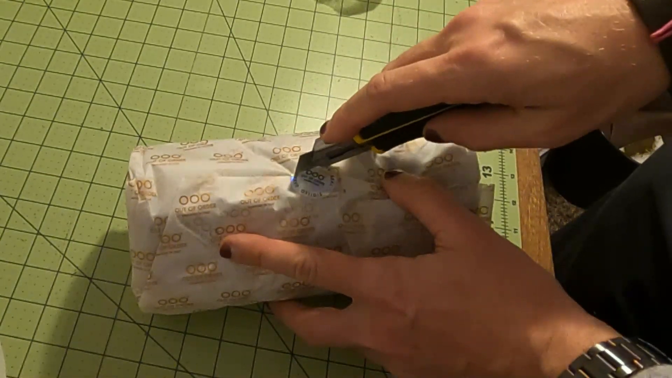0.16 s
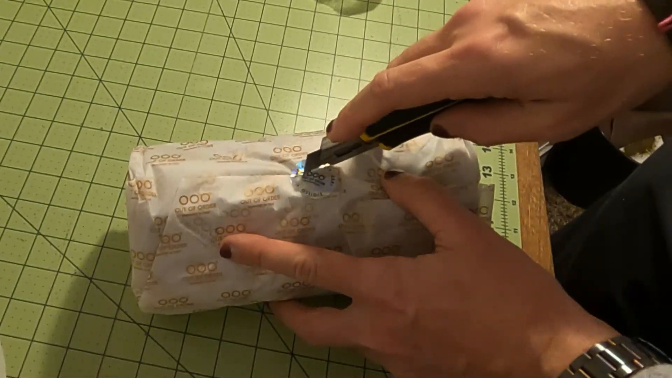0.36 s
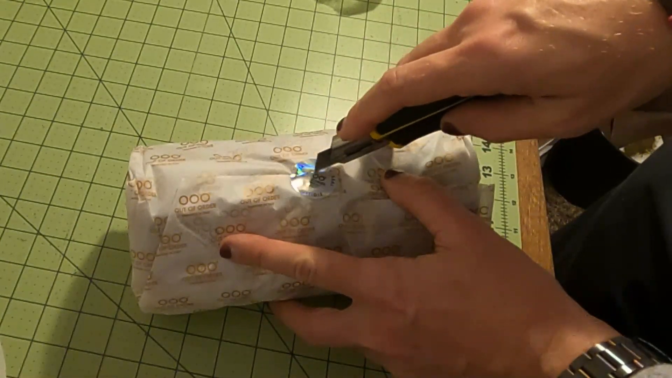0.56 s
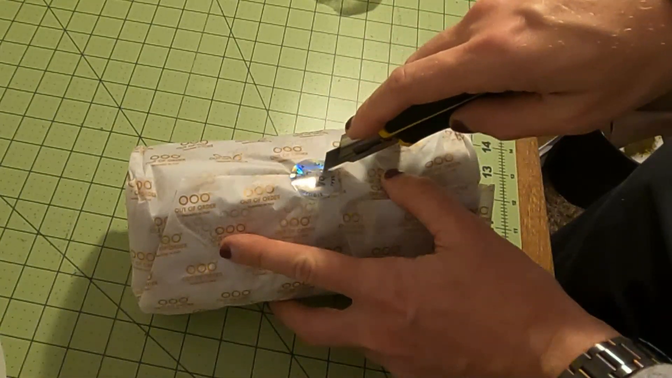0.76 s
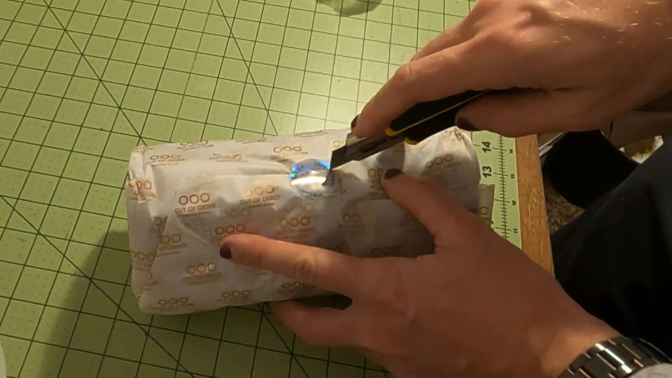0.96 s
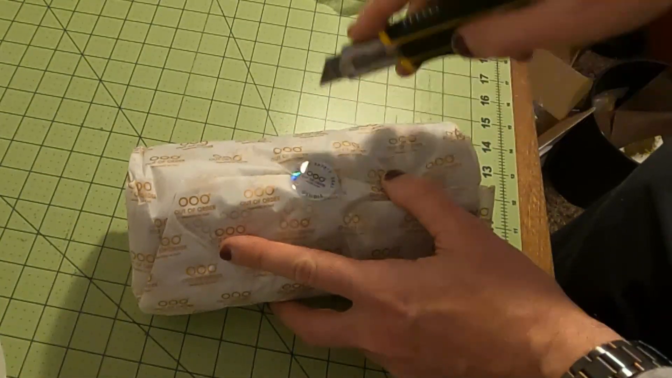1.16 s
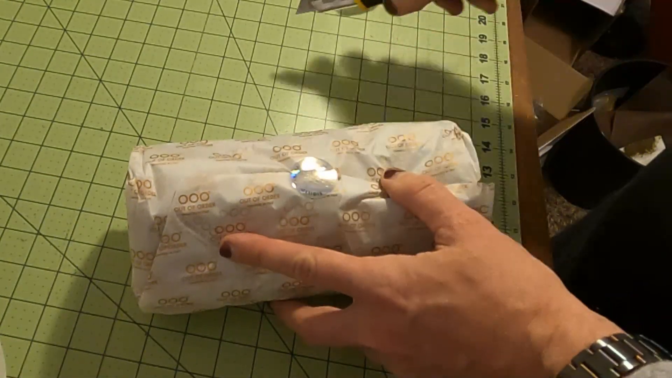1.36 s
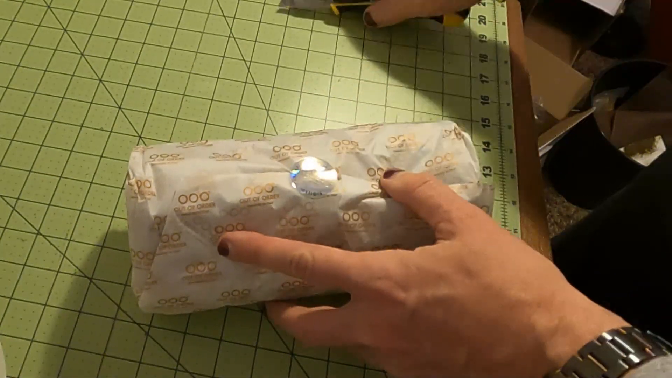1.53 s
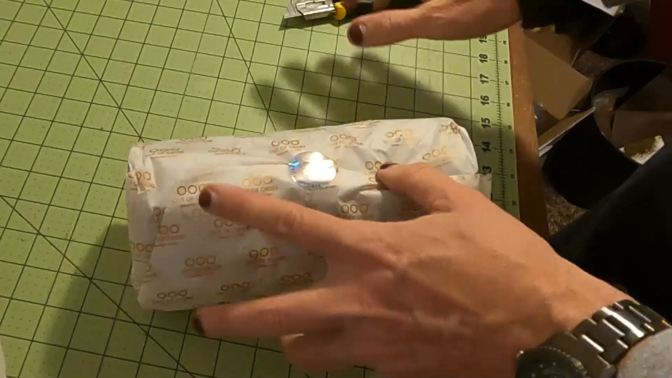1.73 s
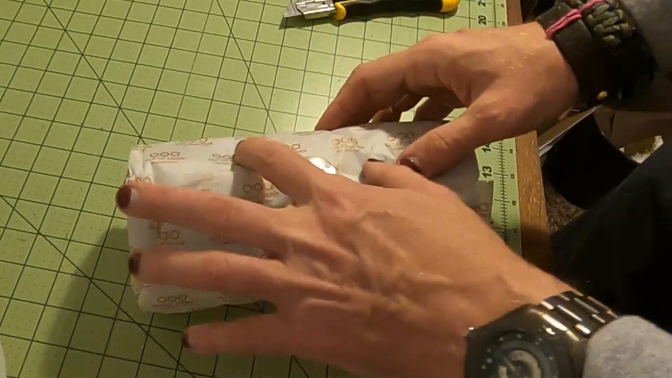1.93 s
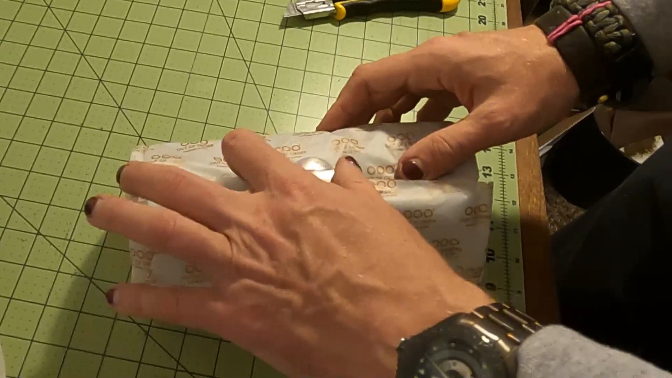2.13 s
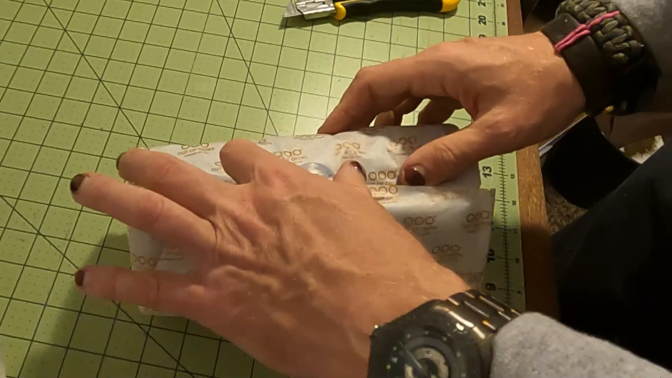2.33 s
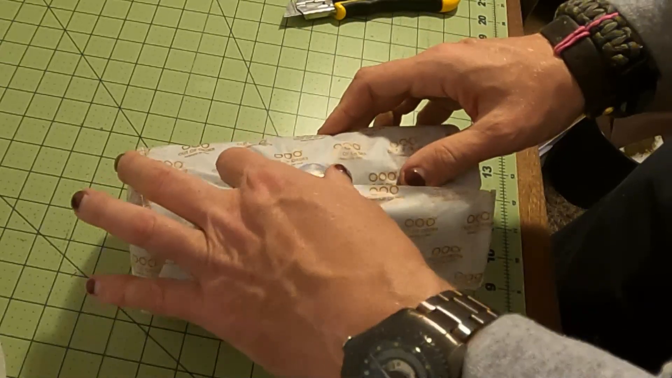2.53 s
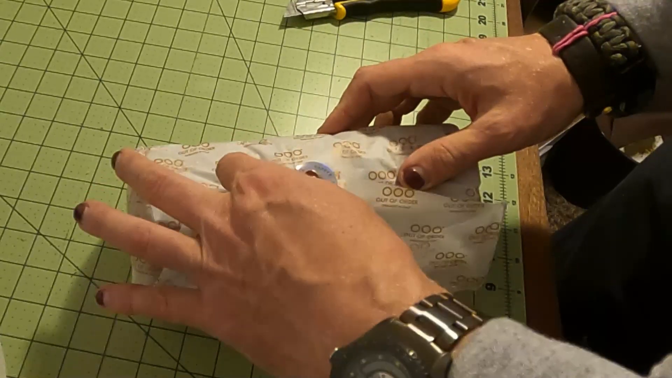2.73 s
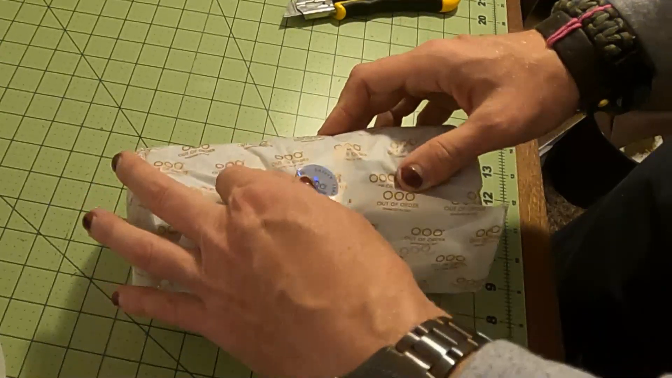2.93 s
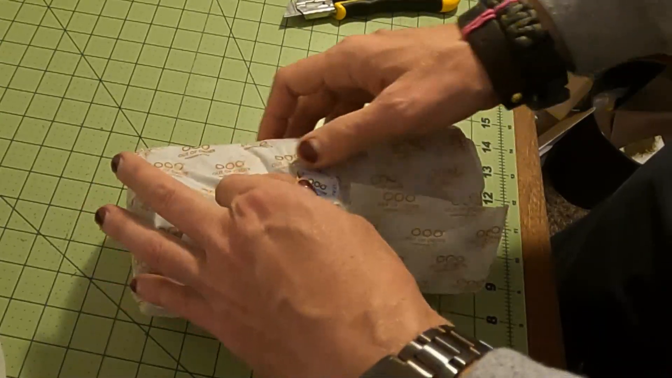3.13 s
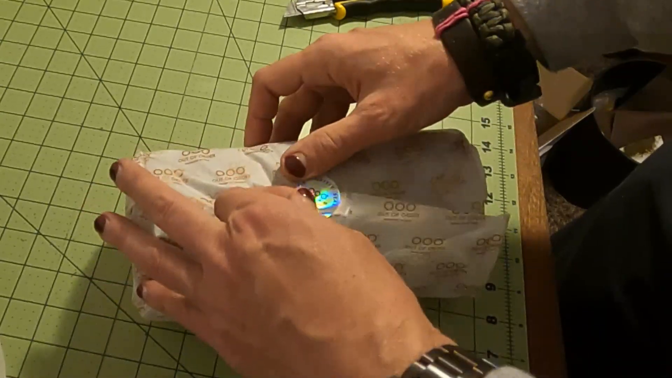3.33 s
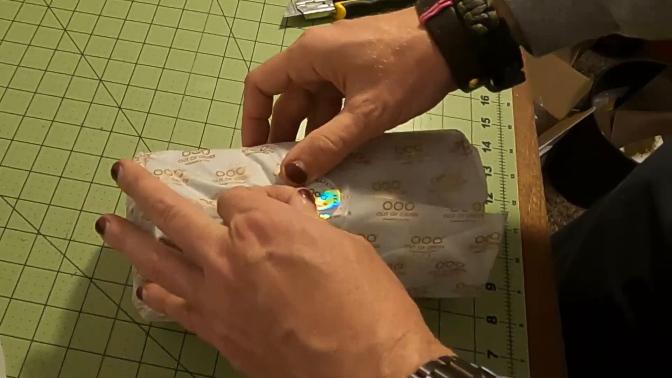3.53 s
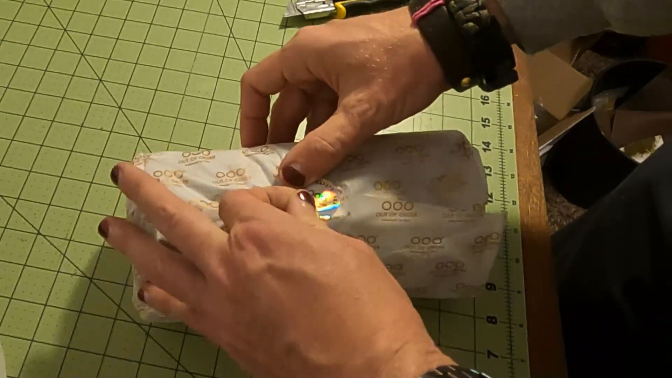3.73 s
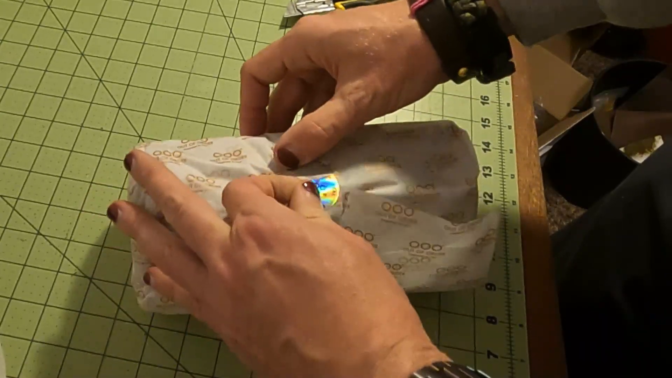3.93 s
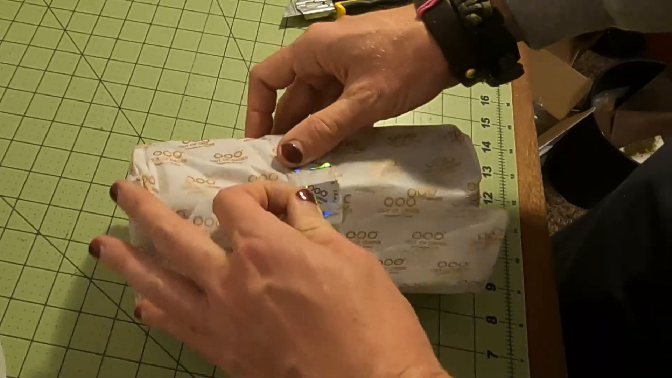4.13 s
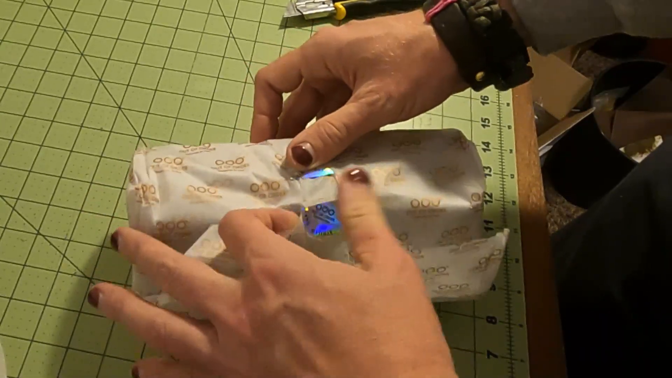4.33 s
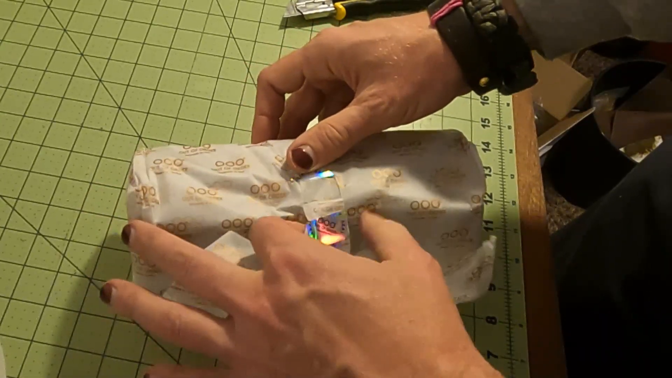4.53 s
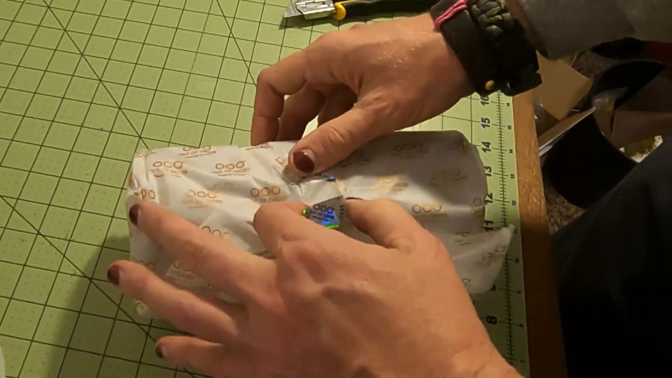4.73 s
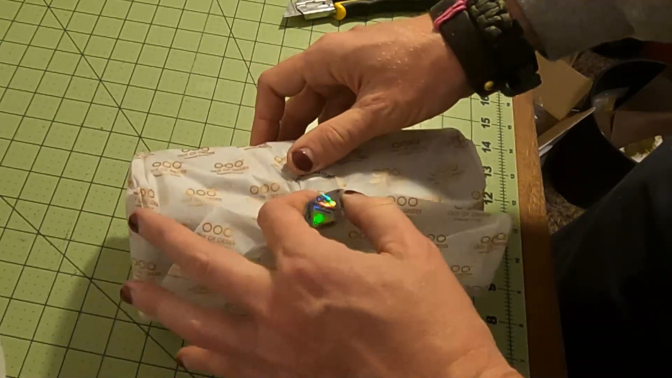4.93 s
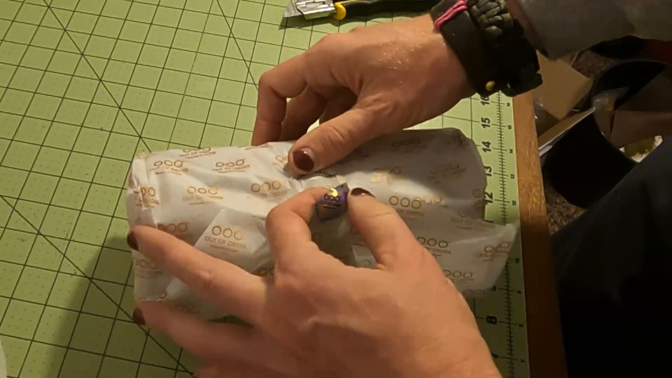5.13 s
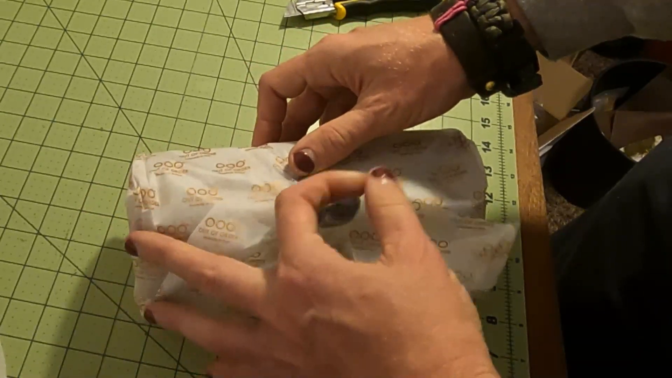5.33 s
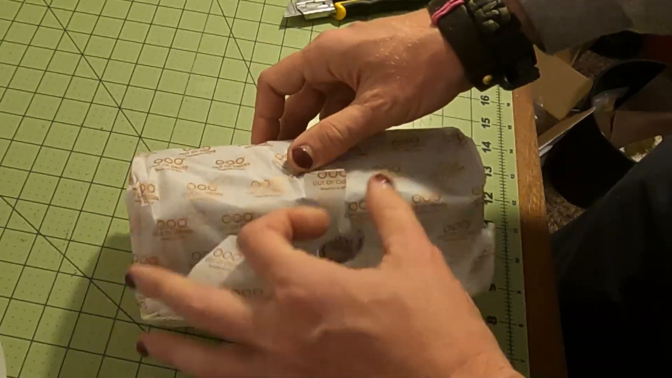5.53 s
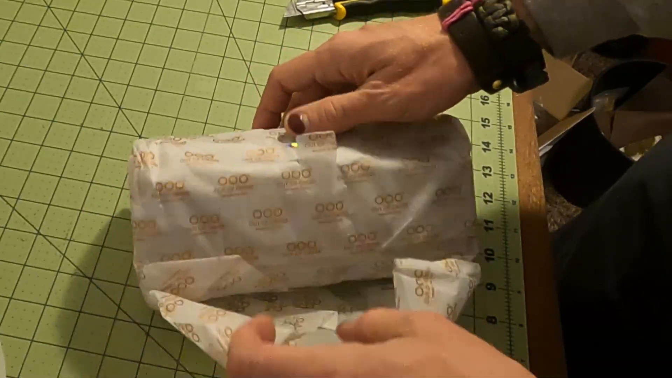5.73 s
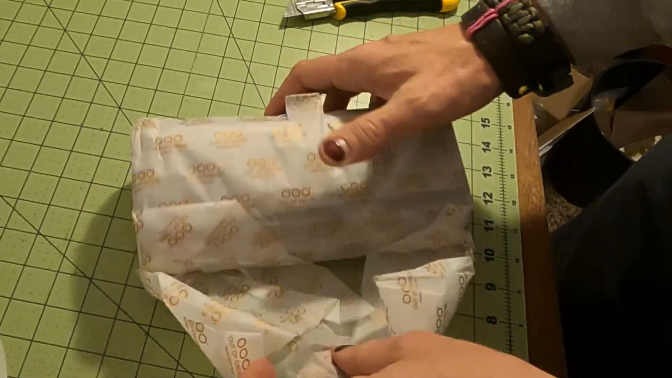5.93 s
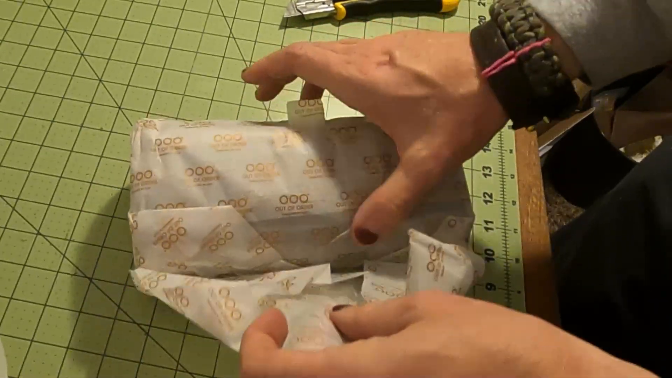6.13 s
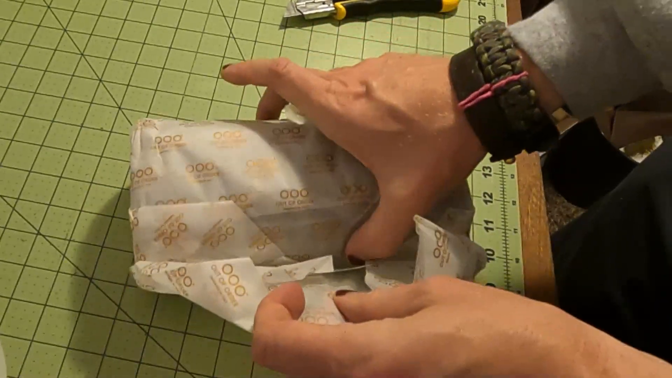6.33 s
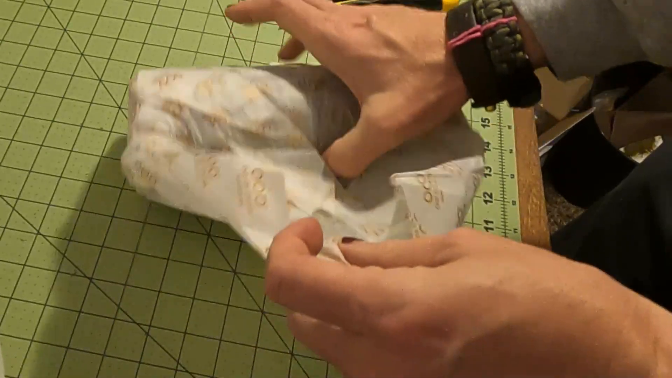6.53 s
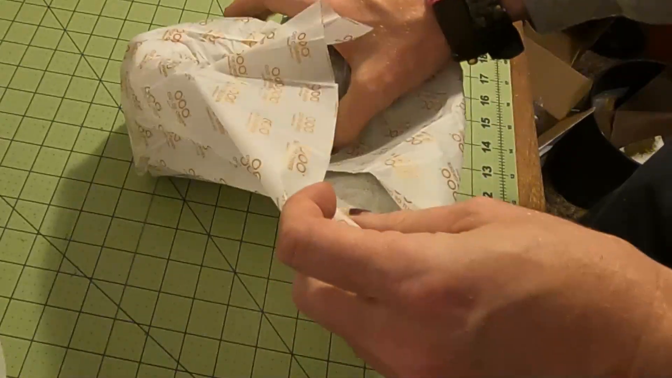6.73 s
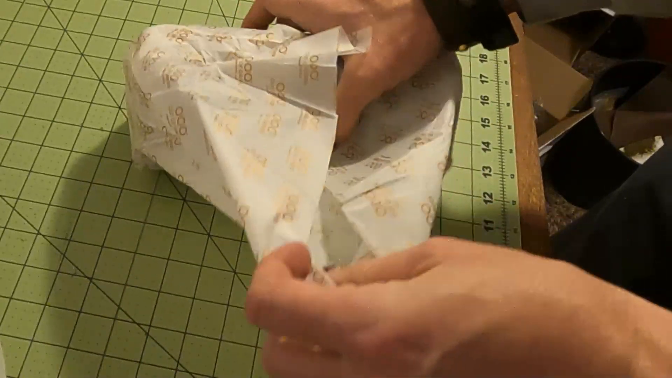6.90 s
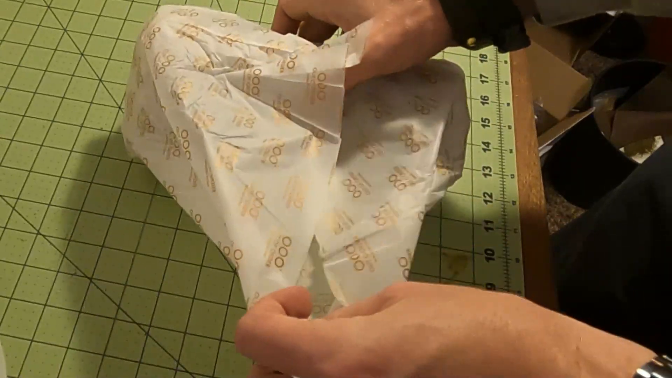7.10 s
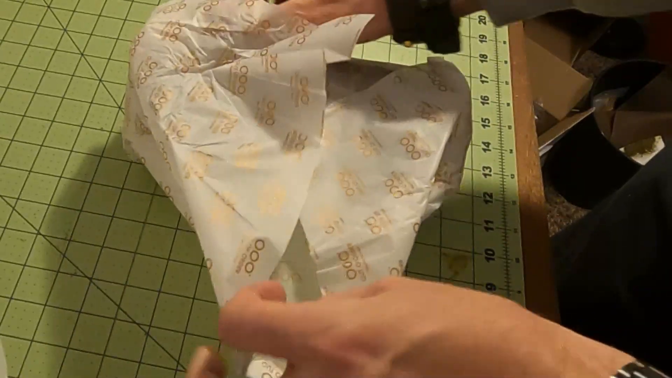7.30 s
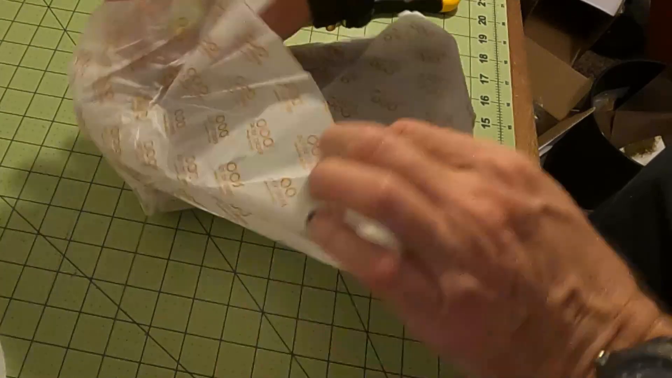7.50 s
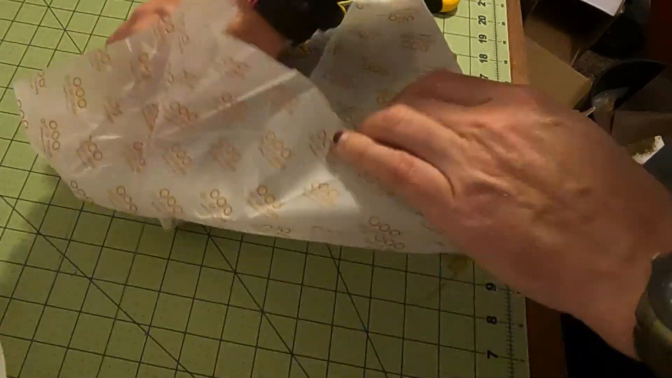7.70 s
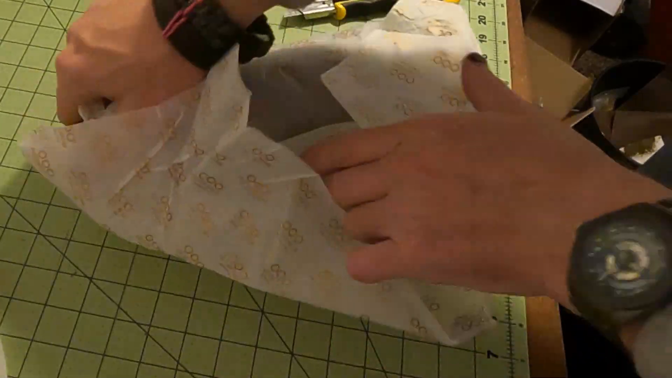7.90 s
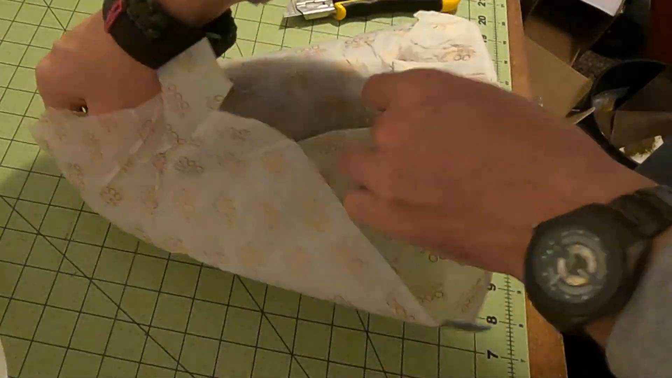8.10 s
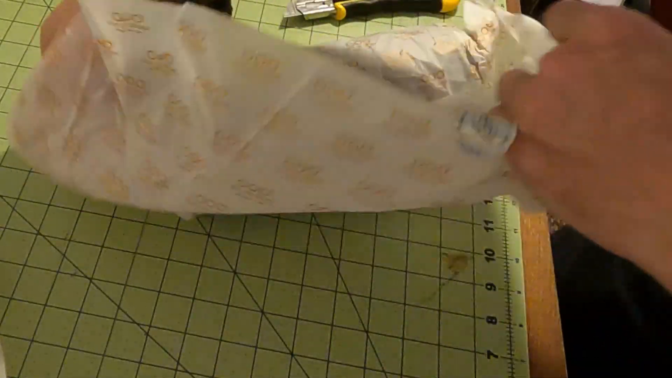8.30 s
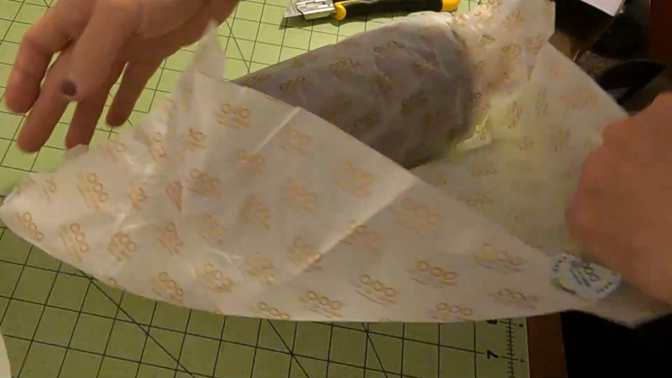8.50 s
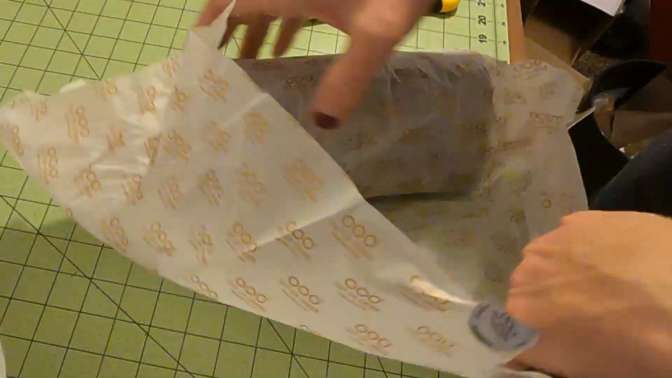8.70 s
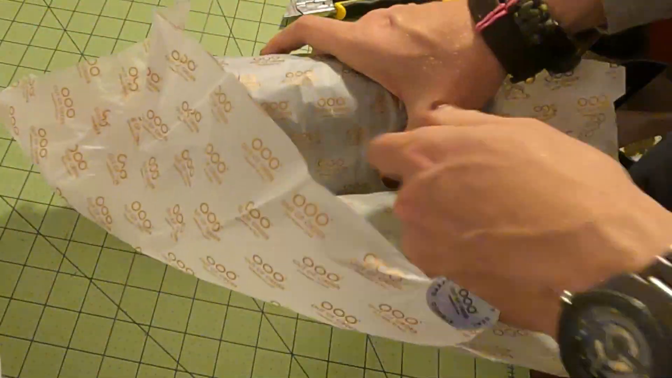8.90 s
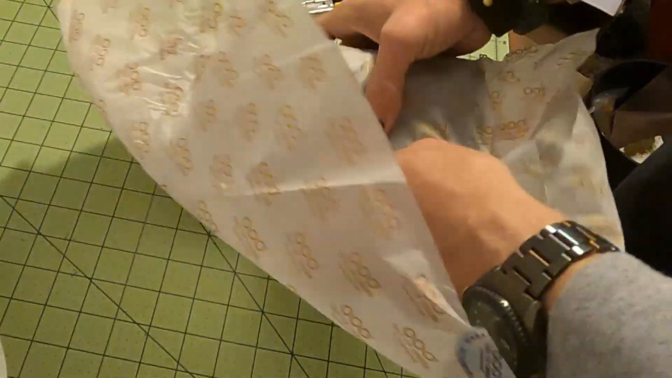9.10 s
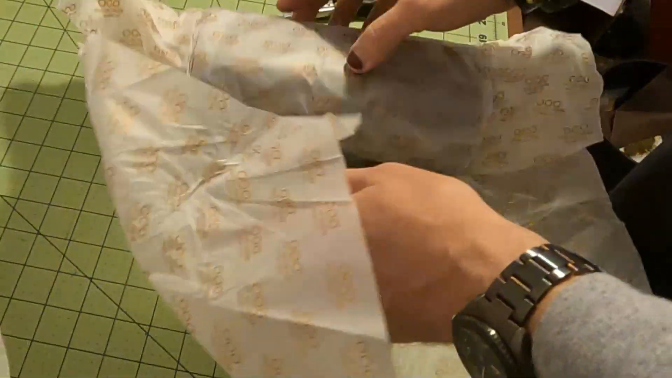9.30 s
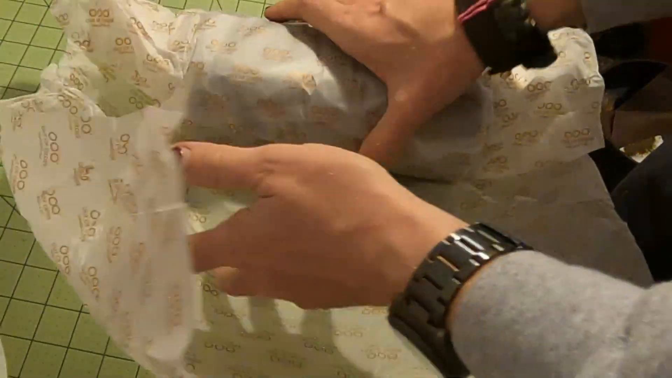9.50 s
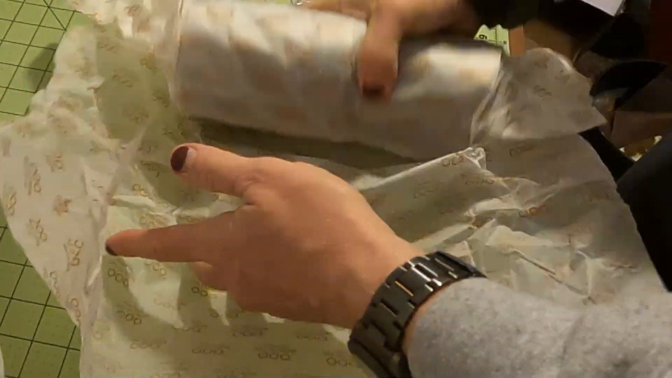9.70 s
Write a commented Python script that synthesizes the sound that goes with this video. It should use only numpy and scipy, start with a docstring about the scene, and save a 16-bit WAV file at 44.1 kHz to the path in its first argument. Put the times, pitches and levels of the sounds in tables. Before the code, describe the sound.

Close tissue paper crackles faintly over a low room hum, a knife clatters down on a table, then the sheet rustles open ever louder.

```python
"""A low hum and drone come first, with the crackle of tissue paper around a box on a wooden table.
A blade slits the sticker, then is put down with a clatter; fingers pick the seal off and pull the sheet open.
The paper is a crowd of tiny random clicks, filtered and echoed, with louder single snaps on top.
Blows ring the table and knife as fading sines, the taut sheet pops the same way, and the hum is
wavering sines with filtered noise for the air and for the shoved box."""
import sys
import numpy as np
from scipy import signal
from scipy.fft import rfft, irfft
from scipy.io import wavfile
from scipy.ndimage import uniform_filter1d

SR = 44100
rng = np.random.default_rng(int(sys.argv[2]) if len(sys.argv) > 2 else 0)


def store_wav(level_fs):
    """Save 16-bit WAV to argv[1]."""
    pcm = np.round(np.clip(np.atleast_2d(level_fs), -1, 1) * 32767)
    wavfile.write(sys.argv[1], SR, pcm.T.astype(np.int16))


N = 429975
TIME = np.arange(N) / SR  # seconds

# In all tables and settings, t60 is the time in seconds to fade by 60 dB.
# steady hum of mains and motors: [pitch_hz, level_db (rms)]
HUM_TONES = [(58, -48.5), (61.3, -52), (80, -51), (116, -82), (120, -40.5), (143, -54.5), (160, -54),
             (222, -64)]
# steady tones of the drone, relative to its level: [pitch_hz, level_db]
DRONE_TONES = [(99.3, -3), (124.3, -8.5)]
# the drone's deepest tone comes twice: [start_s, length_s, level_db (rms), swell_db (start to end)]
BOOMS = [(.04, 0.67, -33.5, -6), (0.92, 0.7, -38, 3)]
# spectrum of the ventilation noise: [frequency_hz, relative_level_db]
AIR_SPECTRUM = [(22, -16), (45, -12.5), (62, 4), (85, -21.5), (105, 1.5), (135, 4), (190, -12.5),
                (310, -11.5), (430, -20.5), (720, -33), (970, -20), (1150, -20), (1550, -29.5), (1730, -26),
                (2200, -33.5), (14000, -51)]
# the hands shove the box: [start_s, length_s, rumble_db]
SHOVES = [(1.98, 0.099, -45), (3.02, .14, -45), (5.422, 0.08, -41), (6.57, 0.25, -56),
          (7.028, 0.069, -36.5), (7.798, 0.73, -51), (8.88, 0.2, -42.5), (9.217, 0.12, -36)]
# spectrum of that rumble: [frequency_hz, relative_level_db]
SHOVE_SPECTRUM = [(15, -18), (36, -9), (50, -45), (68, -12), (95, -15.5), (200, -27.5), (600, -69)]
# faint crackle under the hands between pulls, growing as the sheet comes loose: [time_s, level_db]
STIRRING = [(0, -46), (0.35, -57.5), (1.2, -72.5), (1.47, -70), (1.58, -49.5), (1.92, -50.5), (2.2, -44),
            (2.78, -51.5), (2.98, -51.5), (3.15, -46.5), (3.8, -44.5), (4.33, -36), (4.5, -46.5),
            (4.97, -45.5), (5.2, -43), (5.65, -40.5), (6.15, -31.5), (6.33, -38.5), (7.2, -32), (7.45, -34),
            (8.4, -27.5), (9.02, -34), (9.75, -33.5)]
# each push or pull on the paper: [start_s, length_s, crackle_db, swell_db (start to end),
# treble_db (shelf near 6 kHz), flex_db (whole sheet against crackle, before a shared lift)]
RUSTLES = [(0.39, 0.31, -46, -7.5, -6, -15), (0.721, 0.34, -54, 0, -13, -11.5),
           (1.089, 0.055, -41.5, -10, -14, -11), (1.543, 0.25, -42.5, 6, -7, -9.5),
           (1.941, 0.027, -30.5, -11.5, -18, -16.0), (2.008, 0.018, -32, -1, -1, -16),
           (2.13, 0.198, -37, 7, -7, -11.5), (2.42, 0.063, -35.5, -1, -7, -25),
           (2.543, 0.18, -39.5, -9, -0.5, -12), (3.014, 0.21, -43.5, -2, -1, -12.5),
           (3.25, 0.099, -39.5, -8.5, -3, -18), (3.616, 0.13, -42, -5.5, -0.5, -12),
           (3.851, 0.12, -30.5, -3.5, 0.5, -12), (4.116, 0.14, -29.5, -1, -4, -15),
           (4.576, 0.11, -37.5, -10.5, -3, -30), (4.685, 0.044, -26.5, -2, -3, -13),
           (4.801, 0.054, -39, -7, 1.5, -6), (5.038, 0.28, -42, -6.5, -1.5, -12.5),
           (5.333, 0.11, -36, 5.5, 1, -10.5), (5.513, 0.087, -36, 0.5, 3, -11),
           (5.75, 0.04, -34.5, 0, -2.5, -10.5), (5.801, 0.038, -28.5, -0.5, 3.5, -8),
           (5.93, 0.13, -28, 5.5, -2, -13.5), (6.066, 0.17, -37, -9.5, 0.5, -8.5),
           (6.503, 0.16, -28, 9, 3, -8.5), (6.673, 0.16, -27.5, -5, 2, -10),
           (6.865, 0.13, -28, 5, -3, -13.5), (6.992, 0.1, -24, -2, 1, -12),
           (7.226, 0.045, -28, -3, 0, -13.5), (7.482, 0.097, -32, 4.5, -0.5, -11),
           (7.694, 0.086, -31.5, -1, 2.0, -9.5), (7.809, 0.15, -25.5, -6.5, 1, -13.5),
           (7.832, 0.02, -22.5, -2, -2, -8.5), (8.052, 0.027, -29, 12, 2, -8.5),
           (8.122, 0.073, -30.5, 7, -2.5, -9), (8.302, 0.21, -29.5, 2.5, 1, -10),
           (8.577, 0.11, -30, -0.5, -0.5, -11.5), (8.754, 0.15, -27.5, 2, -5, -18.5),
           (8.94, 0.04, -36.5, 4, -5, -14.5), (9.059, 0.2, -23.5, 0.5, 0.5, -10.5),
           (9.281, 0.14, -27, -4, 1, -11), (9.495, 0.046, -35, 5, -0.5, -12.5),
           (9.637, 0.13, -30.5, 14.5, 1.5, -10.5)]
# spectrum of crackling paper: [frequency_hz, relative_level_db]
CRACKLE_SPECTRUM = [(300, -24), (700, -11), (1050, -4.5), (1750, -1.3), (2500, -1.8), (3600, 0),
                    (5500, -1.5), (7700, -2.5), (8200, -8), (9700, -5.5), (11000, -15), (12000, -15.5),
                    (13300, -25), (15300, -36)]
# spectrum of the whole sheet flexing: [frequency_hz, relative_level_db]
FLEX_SPECTRUM = [(80, -18.5), (170, 0), (310, -1), (520, 0), (750, -0.5), (1000, 5.5), (1350, 0.5),
                 (2200, 11), (5000, -50)]
# colour of the scattered echoes: [frequency_hz, relative_level_db]
ECHO_SPECTRUM = [(60, -12), (250, -10), (1000, -10), (3000, -6), (8000, -7.5), (10500, -3), (13000, 6)]
# loudest single creases snapping: [start_s, relative_strength_db, pitch_hz,
# run_db (smaller creases after the crack, against the crack)]
SNAPS = [(0.0476, -16.5, 2770, 1), (0.0936, -5.5, 3400, -5), (0.2275, -12, 2800, 0.5),
         (0.302, -22, 3280, -12), (0.457, -5.5, 5630, -7), (0.5488, -11, 2700, -9), (0.6649, -15, 3260, 5),
         (0.6784, -23, 3800, -7), (0.883, -19.5, 3100, -4), (1.0115, -18, 2600, -3),
         (1.1026, -16.5, 3200, -4), (1.1164, -14, 3300, -3), (1.148, -17, 3000, -5),
         (1.296, -22.0, 3800, -5), (1.9503, -10.5, 2500, -2), (1.9581, -13, 3380, -5),
         (2.0187, -9, 3500, 3), (2.2037, -13, 3100, -6), (2.2652, -9, 3180, -1), (2.2949, -7.0, 3180, 5.5),
         (2.4918, -7.5, 3260, -12), (2.6704, -10.5, 5800, 0), (2.7127, -20, 4300, 0),
         (2.7966, -17.5, 3800, -1), (2.8413, -16.5, 2700, 2), (2.8868, -10.5, 5930, -4),
         (2.9373, -16, 6200, -1), (3.5378, -12.5, 4030, -4), (3.629, -9.5, 4700, -14),
         (3.7356, -13, 4300, -3), (3.9916, -12, 3380, -12), (4.0266, -10.0, 4300, 0),
         (4.1362, -4.5, 4000, -6), (4.154, -5.5, 3900, 0), (4.3257, -11.5, 3200, 0),
         (4.4052, -11, 4500, -12), (4.4783, -12, 3300, -11), (4.5074, -14.5, 5500, -8),
         (4.5307, -10, 6300, -11), (4.619, -4, 2940, -12), (4.6462, -14, 3400, -6), (4.6997, -7, 3800, 0),
         (4.7913, -10.0, 4400, -5), (4.821, -11.5, 2100, 0), (4.8647, -15, 4000, 3), (4.882, -13, 2900, -6),
         (4.958, -10, 2660, -2), (5.034, -14, 3200, -2), (5.0708, -7.5, 3100, -5),
         (5.0992, -11.5, 3500, -1), (5.1314, -5, 4800, -18), (5.1534, 3.5, 7200, -4),
         (5.2232, -3.5, 5200, -12), (5.2457, -5, 3400, -10), (5.2582, -5, 3900, -7), (5.296, -8, 4100, -16),
         (5.3495, -9.5, 3300, 4), (5.3731, -6, 5600, 1), (5.399, -5, 3800, -17), (5.4247, -4.5, 3400, -2),
         (5.5058, -6, 3400, -5), (5.543, -11, 4300, 2), (5.5718, 1.5, 6350, -5), (5.715, -2, 7100, -3),
         (5.889, -3.5, 3900, 0), (5.9633, -6, 4200, 0), (6.1039, -3.0, 4200, -11), (6.1284, 0.5, 4400, -7),
         (6.1475, -4, 4000, -7), (6.2511, -12, 4900, -11), (6.305, -19, 3100, -8), (6.359, -2, 5300, -7),
         (6.375, -14, 6100, -7), (6.394, -2.5, 8200, -10), (6.4249, -9, 2300, -3), (6.6684, 1.5, 5900, -12),
         (7.1335, -7, 3600, 2), (7.2215, -2, 7000, -10), (7.959, 2, 2380, -15), (8.0332, -0.5, 2900, 0),
         (8.2506, -1, 2200, -8), (8.739, -3, 4300, -12), (8.818, -5, 4400, 1), (9.4606, -7, 4500, 6),
         (9.5317, -7, 4740, -2), (9.5463, -10, 3500, -13), (9.6723, 0, 4930, -2)]
# the blade's slips heard through the box: [frequency_hz, relative_level_db]
BOX_SPECTRUM = [(250, -10), (420, -5), (520, 10), (600, -2), (750, -10), (1500, -37)]
# rasp of the blade's edge: [frequency_hz, relative_level_db]
RASP_SPECTRUM = [(800, -9), (1700, -1.5), (3300, 2.5), (4700, -1), (5400, -8), (9000, -27)]
# blows on the table: [start_s, strength_db, hardness_db, knife_clack_db, clack_pitch_hz]
KNOCKS = [(1.633, -15, 8, -11, 1500), (1.675, -9.5, -2.5, -11.5, 3800), (1.707, -13, -3, -18, 3600),
          (1.732, -8.5, 5.5, -17, 2480), (1.760, -8.5, 6, -11, 2000), (1.788, -0.5, -23, -40, 1500),
          (1.840, -14.5, 6.5, -19, 2200), (1.863, -10, -11, -27, 2000), (1.95, -31, 3.5, -43, 3000),
          (3.867, -30, 13, -48, 3000), (9.264, -21, -1, -55, 3000), (9.509, -31, -5, -62.5, 3000)]
# ring of the knife body: [pitch_hz, level_db, t60_s]
KNIFE_MODES = [(942, -23, 0.029), (1300, -17, 0.0069), (2060, -11, 0.011), (2580, -7, 0.0095),
               (3400, -4, 0.0092), (3900, -4.5, 0.0078), (5300, -1, 0.0031), (7050, -9, 0.0057),
               (9000, -33, 0.0073)]
# ring of the table: [pitch_hz, level_db, t60_s]
TABLE_MODES = [(36.5, -26, 0.33), (69.3, -17, 0.35), (119, -3.5, 0.074), (131.7, -7, 0.25),
               (185, -17, 0.13), (235, -11.5, 0.16), (292, -19.5, 0.35), (328, -15.5, 0.25),
               (437, -22, 0.2), (543, -28, 0.27), (677, -27.5, 0.16), (767, -26, 0.1), (904, -30.5, 0.19),
               (970, -20, 0.051), (1210, -38, 0.26), (1477, -37, 0.19), (1700, -40, .2), (2186, -43, .2),
               (2745, -46, 0.12)]
# spectrum of the short thud of a hard blow: [frequency_hz, relative_level_db]
THUD_SPECTRUM = [(60, -14), (150, 0.5), (330, -4.5), (600, -13.5), (1100, -20.5), (2200, -28), (5000, -38),
                 (12000, -61)]
# taut paper popping as the seal gives: [start_s, strength_db]
POPS = [(3.865, -9), (5.4252, -18)]
# ring of the taut sheet: [pitch_hz, level_db, t60_s]
SHEET_MODES = [(284, 0, 0.024), (474, 8.5, 0.0047), (680, 5, 0.0057), (1430, -12, 0.024),
               (2920, -2, 0.0069), (3620, -5, 0.004), (5300, -2, .003), (7000, -2, 0.0024)]

DRONE_START_S, DRONE_LENGTH_S, DRONE_ATTACK_S, DRONE_T60_S = 0.042, 1.9, 0.12, 1.4
DRONE_DB, DRONE_SWELL_DB, BOOM_HZ = -37.5, -4, 62.5
SHOVE_ATTACK_S, SHOVE_T60_S, HANDS_RESTING_DB = 0.022, 0.55, -57
# a rustle starts as the fingers take hold and dies as the sheet settles
GRIP_S, SETTLE_T60_S = 0.022, 0.2
# lesser snaps by chance: greatest rate, strength at the mean rustle level, share of its swing they follow
STRAY_SNAPS_PER_S, STRAY_SNAP_DB, STRAY_FOLLOWS = 26, -14.5, 0.82
CRACK_T60_S = 0.007
SLIT_START_S, SLIT_LENGTH_S, SLIT_ATTACK_S, SLIT_T60_S = 0.363, 0.67, 0.15, 0.25
SLIT_DB, SLIT_SWELL_DB = -58, -20
ROOM_T60_S, CUTOFF_HZ = 0.44, 15400


def from_db(db):
    """Turn decibels into gain."""
    return 10 ** (np.asarray(db) / 20)


def rms_one(x):
    """Scale to unit power."""
    return x / np.sqrt(np.mean(x ** 2) + 1e-20)


def in_time(rows):
    """Draw straight lines between table rows, giving each column at every sample."""
    s, *columns = np.transpose(rows)
    return [np.interp(TIME, s, column) for column in columns]


def gain_at(points, hz):
    """Read the gain of a spectrum, its points joined on a log-frequency axis."""
    f, level_db = np.transpose(points)
    return from_db(np.interp(np.log(hz + 1), np.log(f), level_db))


def colour(x, points, size=8192):
    """Filter with the given spectrum, at unit energy and with no sound before its cause (minimum phase)."""
    cepstrum = irfft(np.log(gain_at(points, np.fft.rfftfreq(size, 1 / SR))))
    # keeping one half of the cepstrum, doubled, makes the filter causal
    half = np.r_[0, np.ones(size // 2 - 1), np.zeros(size // 2)]
    response = irfft(np.exp(rfft(2 * cepstrum * half)))
    response = response / np.linalg.norm(response)
    return signal.oaconvolve(np.atleast_2d(x), response[None], axes=1)[:, :N]


def drift(rate):
    """Wander smoothly by chance with spread 1, changing about rate times a second."""
    source = np.random.default_rng(rng.integers(2 ** 31))
    knots = source.standard_normal(int(N / SR * rate) + 2)
    return rms_one(np.interp(TIME * rate, np.arange(len(knots)), knots))


def ring(clicks, hz, t60):
    """Let each unit click set a fading sine of height 1 ringing."""
    r, w = from_db(-60 / (t60 * SR)), 2 * np.pi * hz / SR
    return signal.lfilter([0, np.sin(w)], [1, -2 * r * np.cos(w), r * r], clicks + 1e-18)


def clicks_at(times, gains):
    """Place one click at each time."""
    return np.bincount(np.clip(np.round(times * SR).astype(int), 0, N - 1), gains, N)


def fading(clicks, t60):
    """Make an envelope that jumps at each click and dies away."""
    return signal.lfilter([1], [1, -from_db(-60 / (t60 * SR))], clicks + 1e-18)


def brighten(x, treble_db, corner_hz=6000):
    """Raise or lower the treble with a shelf whose height may move."""
    high_pass = signal.butter(1, corner_hz, "high", fs=SR, output="sos")
    treble = signal.sosfilt(high_pass, x)
    return x + (from_db(treble_db) - 1) * treble


def stroke(start, length, level_db, swell_db, attack, t60):
    """Gain of one movement: a quick rise, a hold that swells or fades about its level, a dying release."""
    age = TIME - start
    hold_db = level_db + swell_db * (np.clip(age / length, 0, 1) - 0.5)
    release_db = -60 * np.clip((age - length) / t60, 0, 3)
    return np.clip(age / attack, 0, 1) * from_db(hold_db + release_db)


def scattered(x, points, diffuse_db=2.0, early_t60=0.03, late_share=0.26):
    """Colour a sound with its echoes, fading noise whose paths over the moving folds never repeat."""
    power = np.mean(np.atleast_2d(x) ** 2, axis=0)

    def echo_power(t60):
        # power fades twice as fast in dB as gain; the last factor keeps the total equal
        return fading(power, t60 / 2) * (1 - from_db(-120 / (t60 * SR)))

    both = echo_power(early_t60) + late_share * echo_power(ROOM_T60_S)
    echoes = np.sqrt(both) * rng.standard_normal((2, N))
    return colour(x + from_db(diffuse_db) * colour(echoes, ECHO_SPECTRUM), points)


def tones(lines, waver):
    """Add up steady tones whose phase wanders a little."""
    total = 0
    for hz, rms_db in lines:
        phase = 2 * np.pi * (hz * TIME + rng.random()) + waver * drift(2.1)
        total = total + np.sqrt(2) * from_db(rms_db) * np.sin(phase)
    return total


def background(air_db=-44.0, air_side_db=-14):
    """Hum and drone as sines, ventilation as filtered noise, and the low noise of the shoved box."""
    shove = from_db(HANDS_RESTING_DB)
    for row in SHOVES:
        shove = shove + stroke(*row, 0, SHOVE_ATTACK_S, SHOVE_T60_S)
    middle, side = rng.standard_normal((2, N))
    air = middle + from_db(air_side_db) * side * np.array([[1], [-1]])  # differs a little left and right
    rumble = shove * colour(rng.standard_normal(N), SHOVE_SPECTRUM)
    return tones(HUM_TONES, waver=0.13) + drone() + from_db(air_db) * colour(air, AIR_SPECTRUM) + rumble


def drone():
    """Two steady low tones that later die away, over a deeper one that comes twice."""
    steady = stroke(DRONE_START_S, DRONE_LENGTH_S, DRONE_DB, DRONE_SWELL_DB, DRONE_ATTACK_S, DRONE_T60_S)
    boom = sum(stroke(*row, DRONE_ATTACK_S, DRONE_T60_S) for row in BOOMS)
    return steady * tones(DRONE_TONES, waver=0.57) + boom * tones([(BOOM_HZ, 0)], waver=0.28)


def handling():
    """Level, treble and flexing in dB: rustles add to the stirring, and colour glides between rustles."""
    start, length, level_db, swell_db, treble_db, flex_db = np.transpose(RUSTLES)
    power = from_db(in_time(STIRRING)[0]) ** 2
    for row in zip(start, length, level_db, swell_db):
        power = power + stroke(*row, GRIP_S, SETTLE_T60_S) ** 2
    middle = start + length / 2
    return 10 * np.log10(power), np.interp(TIME, middle, treble_db), np.interp(TIME, middle, flex_db)


def creases(per_s, size_db, largest):
    """Random buckling clicks, up or down, evened to about unit power; size_db spreads their sizes."""
    sizes = from_db(size_db * np.minimum(rng.exponential(1, N), largest)) * rng.choice([-1, 1], N)
    clicks = sizes * (rng.random(N) < per_s / SR)
    nearby_power = np.abs(uniform_filter1d(clicks ** 2, size=1800))
    return clicks / np.sqrt(nearby_power + 1e-3)


def facets(clicks, width_hz, spread_db, shift_db, turn_rate=30, count=40):
    """Each click briefly rings one small facet; facets turn to and from the microphones."""
    at = np.flatnonzero(np.abs(clicks) > 1e-5)
    dealt = rng.integers(0, count, N)[at]  # which facet each click rings
    halves = np.zeros((2, N))
    facing = rng.standard_normal((count, 1000))
    pitches_hz = np.linspace(np.sqrt(250), np.sqrt(14500), count) ** 2
    for k, hz in enumerate(pitches_hz):
        mine = at[dealt == k]
        turn = (TIME[mine] * turn_rate).astype(int) % facing.shape[1]
        hits = clicks_at(TIME[mine], clicks[mine] * from_db(shift_db * facing[k, turn]))
        damping = np.sqrt(hz / 6000)  # small, high facets die sooner
        r = np.exp(-np.pi * width_hz * damping / SR)
        gain = np.sqrt(damping * (1 - r * r) / 2)
        feedback = [1, -2 * r * np.cos(2 * np.pi * hz / SR), r * r]
        halves[k % 2] += signal.lfilter([gain, 0, -gain], feedback, hits + 1e-18)
    # half of the facets lie a little to the left, half to the right
    return from_db(spread_db) * halves + from_db(-spread_db) * halves[::-1]


def paper(level_db, crisp_db, body_db, rate=2600, rate_growth=0.9, clump_db=3.5,
          ring_db=-3, tick_db=-5, slide_db=-17, flex_db=5.0):
    """Harder pulls give denser creases, which come in small avalanches over a sliding hiss."""
    swing_db = level_db - np.mean(level_db)
    per_s = rate * from_db(rate_growth * swing_db)
    # light touches are fitful, a steady pull averages out
    fitful = np.clip(0.5 - swing_db / 30, 0.3, 1.2)
    effort = from_db(level_db + clump_db * fitful * (drift(150) + 0.23 * drift(55)))
    buckling = creases(per_s, size_db=0.0, largest=4.8)
    # each crease ticks and rings its own facet; paper held tight on the box rings less than a loose sheet
    loose_db = np.clip(0.35 * (level_db + 32.5), -8, 0)
    ticks = from_db(tick_db - 1.03 * loose_db) * buckling
    ringing = from_db(ring_db + loose_db) * facets(buckling, width_hz=400, spread_db=1.22, shift_db=2.5)
    hiss = from_db(slide_db) * rng.standard_normal(N)
    source = effort * (ticks + ringing + hiss)
    crackle = brighten(scattered(source, CRACKLE_SPECTRUM), crisp_db)
    # the same creases jolt the whole sheet, which sounds lower
    return crackle + scattered(source * from_db(body_db + flex_db), FLEX_SPECTRUM)


def crease(strength_db, hz, run_db, q, broad_db, run_t60):
    """A crack runs along the fold and sets off smaller ones, all ringing the same patch of paper."""
    age = TIME[:3000]
    crack, run = rng.standard_normal((2, len(age)))
    crack = np.sign(crack) * from_db(-60 * age / CRACK_T60_S)
    # squaring the noise, sign kept, makes a few clicks stand out; they build up over 4 ms
    run = run * np.abs(run) * from_db(-60 * age / run_t60) * np.clip(age / 0.004, 0, 1)
    clicks = crack / np.linalg.norm(crack) + from_db(run_db) * run / np.linalg.norm(run)
    b, a = signal.iirpeak(np.clip(hz, 800, 11000), q, fs=SR)
    sound = signal.lfilter(b, a, clicks) + from_db(broad_db) * clicks
    return from_db(strength_db) * sound * np.linalg.norm(clicks) / np.linalg.norm(sound)


def snaps(rustle_db, crack_db=-5.0, q=1.4, broad_db=-15, run_t60=0.049, stray_spread_db=4,
          stray_hz=3400, stray_octaves=0.83, stray_run_db=-7):
    """Stiff creases give way, each at its own pitch; lesser ones grow rare as the hands near stillness."""
    swing_db = rustle_db - np.mean(rustle_db)
    s, chance, size, pitch = rng.random((1000, 4)).T
    at = (s * N).astype(int)
    per_s = STRAY_SNAPS_PER_S * np.minimum(from_db(swing_db[at]), 1)
    kept = chance < per_s * N / SR / len(s)
    stray_db = STRAY_SNAP_DB + STRAY_FOLLOWS * swing_db[at] + stray_spread_db * (2 * size - 1)
    pitch_hz = stray_hz * 2 ** (2 * stray_octaves * (2 * pitch - 1))
    strays = np.c_[TIME[at], stray_db, pitch_hz, np.full(len(s), stray_run_db)]
    rows = np.r_[SNAPS, strays]
    heard = np.r_[np.ones(len(SNAPS)), kept]
    source = np.zeros(N + SR)  # room for a snap that starts near the end
    for (start, *row), on in zip(rows, heard):
        sound, i = crease(*row, q, broad_db, run_t60), int(start * SR)
        source[i:i + len(sound)] += on * sound
    return from_db(crack_db) * scattered(source[:N], CRACKLE_SPECTRUM)


def slit(box_db=-1, rasp_db=5, edge_swell_db=8, catches_per_s=330):
    """The blade's small slips sound through the box while its edge catches and ticks in the paper."""
    drag = stroke(SLIT_START_S, SLIT_LENGTH_S, SLIT_DB, SLIT_SWELL_DB, SLIT_ATTACK_S, SLIT_T60_S)
    slips = drag * creases(1500, size_db=3, largest=3)
    catches = drag * creases(catches_per_s, size_db=5.0, largest=2.7)
    # as the pressure eases, the box falls quiet sooner than the edge
    progress = np.clip((TIME - SLIT_START_S) / SLIT_LENGTH_S, 0, 1)
    edge = from_db(rasp_db + edge_swell_db * progress) * catches
    return from_db(box_db) * colour(slips, BOX_SPECTRUM) + scattered(edge, RASP_SPECTRUM)


def knife(scatter_db=5.0, off_pitch_db=6, rattle_db=-16, rattle_t60=0.021):
    """Each contact rings the knife's modes, most near its own pitch, and the loose blade rattles."""
    s, _, _, hit_db, hit_hz = np.transpose(KNOCKS)
    body = np.zeros(N)
    for k, (hz, mode_db, t60) in enumerate(KNIFE_MODES):
        octaves_off = np.abs(np.log2(hz / hit_hz))
        chance_db = scatter_db * rng.standard_normal(len(s))
        strength_db = hit_db + mode_db - off_pitch_db * octaves_off + chance_db
        body += (-1) ** k * ring(clicks_at(s, from_db(strength_db)), hz, t60)
    rattle = fading(clicks_at(s, from_db(hit_db + rattle_db)), rattle_t60) * rng.standard_normal(N)
    return body + scattered(rattle, CRACKLE_SPECTRUM)


def table(thud_db=-11, thud_t60=0.16, scatter_db=4.0):
    """Every blow rings the table's modes and adds a short rattling thud, stronger for hard blows."""
    s, blow_db, hard_db, _, _ = np.transpose(KNOCKS)
    out = np.zeros(N)
    for k, (hz, mode_db, t60) in enumerate(TABLE_MODES):
        # hardness counts most at high pitches
        chance_db = scatter_db * rng.standard_normal(len(s))
        strength_db = blow_db + mode_db + hard_db * hz / (hz + 600) + chance_db
        out += (-1) ** k * ring(clicks_at(s, from_db(strength_db)), hz, t60)
    rattle = fading(clicks_at(s, from_db(blow_db + hard_db + thud_db)), thud_t60) * rng.standard_normal(N)
    return out + scattered(rattle, THUD_SPECTRUM)


def pops():
    """The stretched sheet is let go and rings like a slack drum."""
    s, pop_db = np.transpose(POPS)
    out = np.zeros(N)
    for k, (hz, mode_db, t60) in enumerate(SHEET_MODES):
        out += (-1) ** k * ring(clicks_at(s, from_db(pop_db + mode_db)), hz, t60)
    return out


def scene(left_db=-0.5, left_treble_db=1.6):
    """Paper and table close to the microphones in the humming room; the left one hears more treble."""
    sides = np.array([[1], [-1]])  # left, right
    rustle_db, crisp_db, body_db = handling()
    sound = background() + paper(rustle_db, crisp_db, body_db) + snaps(rustle_db)
    sound = sound + slit() + knife() + table() + pops()
    return brighten(sound, left_treble_db * sides) * from_db(left_db * sides)


def record(dry):
    """Round the loudest peaks and cut the top steeply."""
    rounded = dry / (1 + (dry / 0.62) ** 4) ** 0.25
    low_pass = signal.ellip(10, 0.2, 90, CUTOFF_HZ, fs=SR, output="sos")
    return signal.sosfilt(low_pass, rounded)


dry = scene()
out = record(dry)
store_wav(out)
```